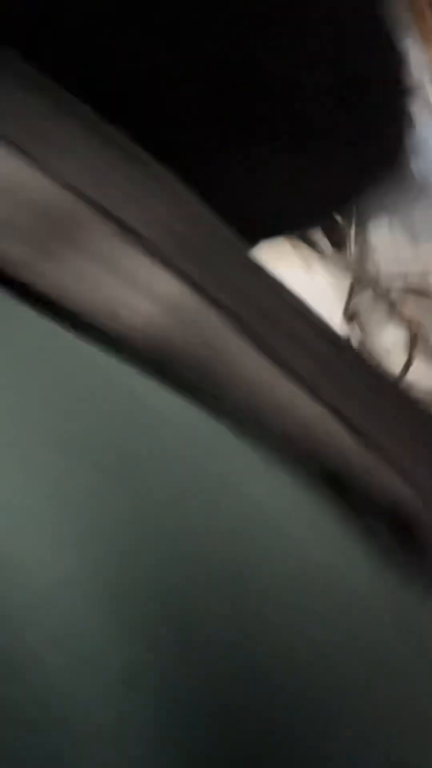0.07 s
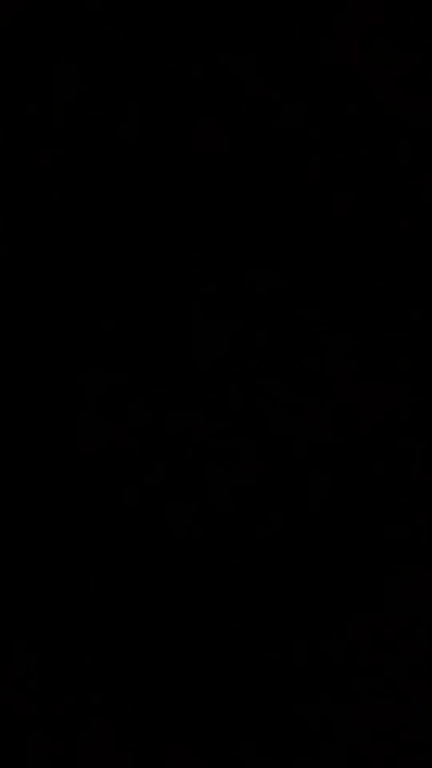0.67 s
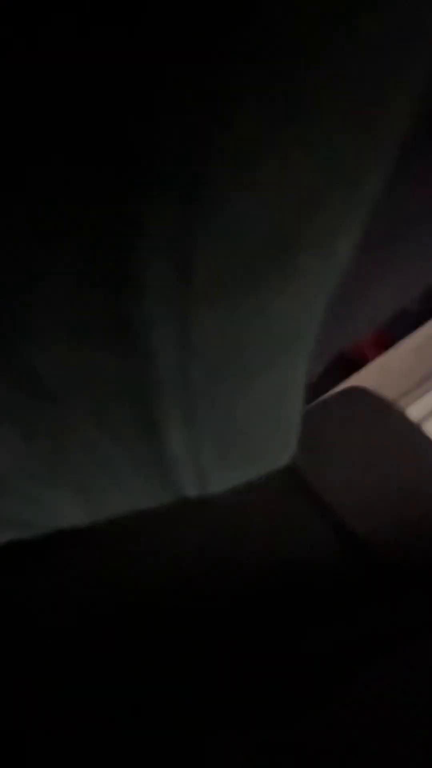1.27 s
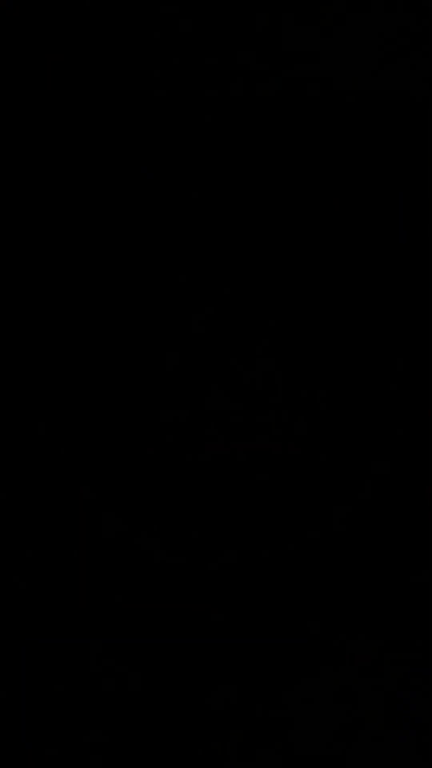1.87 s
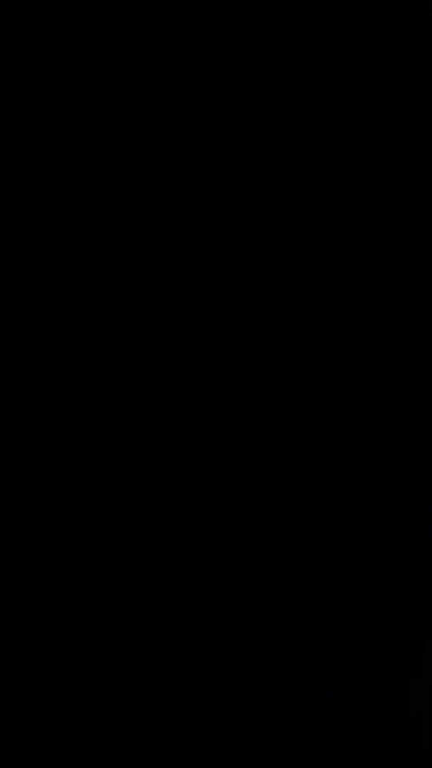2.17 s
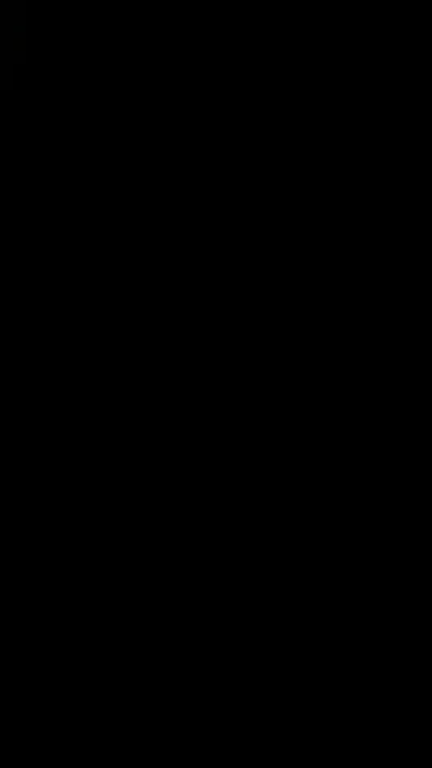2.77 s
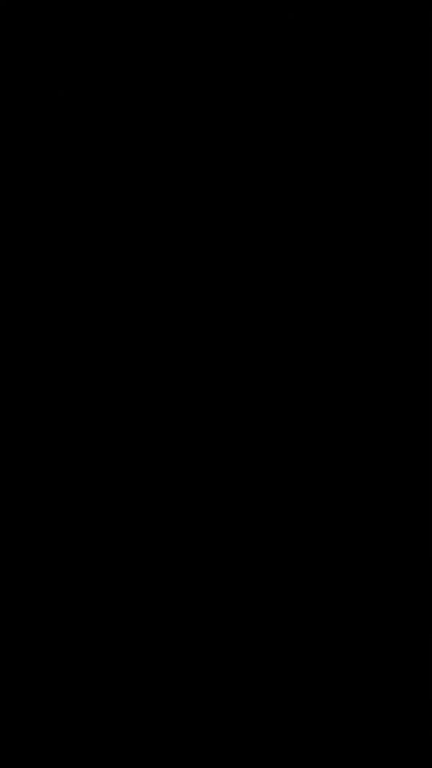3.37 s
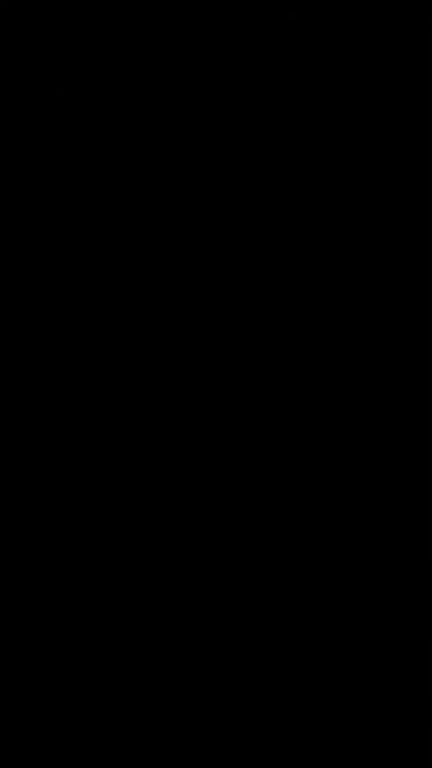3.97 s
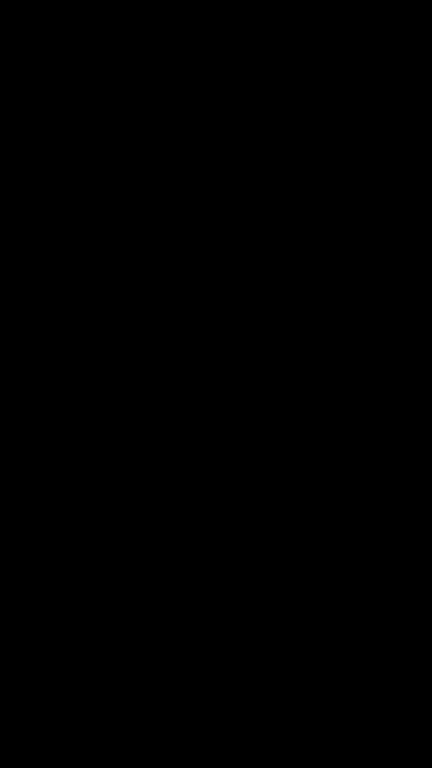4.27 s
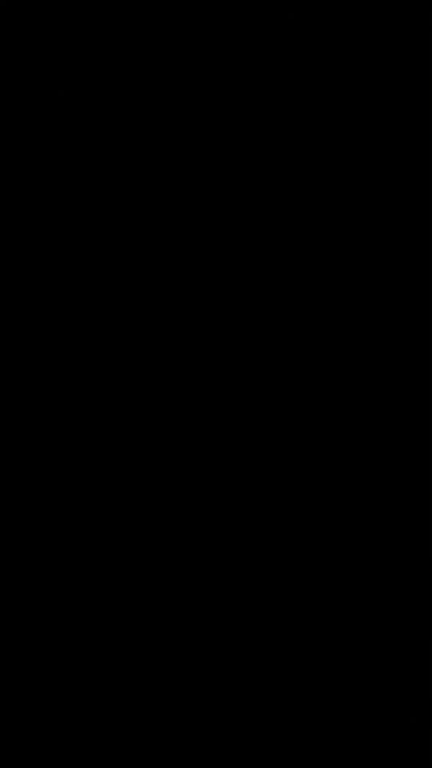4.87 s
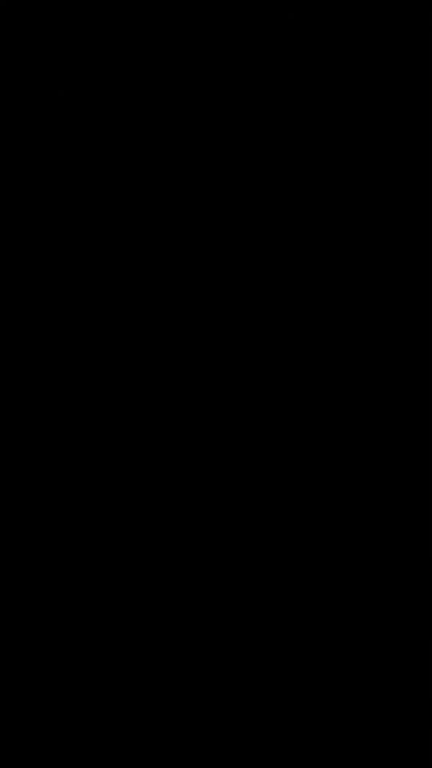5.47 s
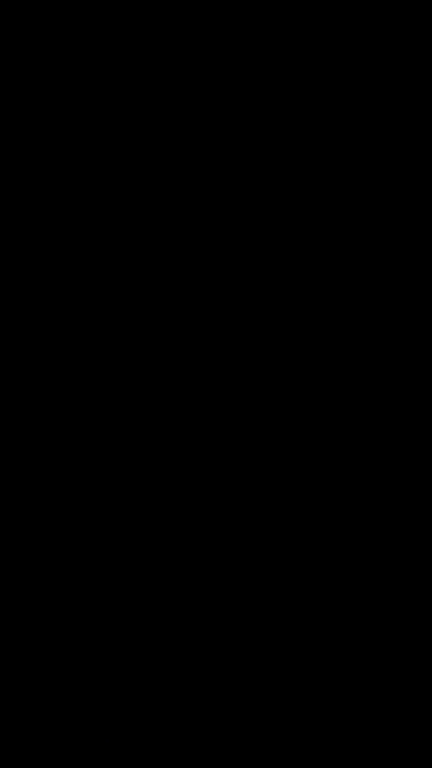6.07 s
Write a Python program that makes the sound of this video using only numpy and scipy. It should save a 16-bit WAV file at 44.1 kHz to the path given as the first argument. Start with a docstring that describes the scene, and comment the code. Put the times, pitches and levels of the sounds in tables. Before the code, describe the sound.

Cloth rubs, rustles and scrapes right against a phone microphone, with dull bumps and small clicks in a quiet room.

```python
"""A phone is moved about in folds of clothing in a quiet room, its two microphone ports brushing the cloth.
Loose fabric swishes past first. From 0.6 s, strokes hiss, rasp and rumble over the case, seams catch
with small clicks and soft bumps thud with a falling pitch. Around 4 s the cloth presses on the ports and
scrubs across them, taut threads squeak, and a wobbling notch climbs through the mids of the rustle.
For the last two seconds the tight cloth drags with a hollow groan."""
import sys
import numpy as np
from scipy import signal
from scipy.fft import rfft, irfft, next_fast_len
from scipy.io import wavfile
from scipy.ndimage import uniform_filter1d

SR = 44100
rng = np.random.default_rng(int(sys.argv[2]) if len(sys.argv) > 2 else 0)


def generate_wav(signal):
    """Clip the signal to [-1, 1] and save it as 16-bit WAV at the path in sys.argv[1]."""
    frames = np.transpose(np.atleast_2d(signal))
    scaled = np.clip(frames, -1, 1) * 32767
    pcm = np.round(scaled).astype(np.int16)
    wavfile.write(sys.argv[1], SR, pcm)


N = 274743
T = np.arange(N) / SR
LEFT_RIGHT = np.array([[1], [-1]])
# resonances of the phone's case: (frequency [Hz], width [Hz], level [dB])
CASE_MODES = [(522, 280, 15), (850, 67, -22), (1032, 150, 6.5), (1276, 33, 1), (1458, 110, -1),
              (1630, 80, -8), (1746, 170, 0.5), (2160, 130, -17), (2330, 21, -3), (4240, 630, -12),
              (6950, 1600, -2)]


def undb(db):
    """Decibels to gain."""
    return 10 ** (np.asarray(db) / 20)


def unit(x):
    """Scale to rms 1."""
    return x / np.sqrt(np.mean(x ** 2))


def add(track, s, sound):
    """Mix a short two-channel sound in at time s."""
    start = int(s * SR)
    track[:, start:start + sound.shape[1]] += sound[:, :N - start]


def curves(table):
    """One automation curve per column, in straight lines between the times in the first."""
    s, *columns = np.transpose(table)
    return [np.interp(T, s, column) for column in columns]


def swells(table, edge_db=14, rise_power=1.62, fall_power=1.61):
    """Slides gather speed, crest and slow down: one envelope per level column, overlaps adding in power."""
    t, power = T[::64], 0
    for start, rise_s, fall_s, *levels_db in table:
        past = t - start - rise_s
        # an exponent of 1 makes a pointed crest, 2 a round one
        away = np.where(past < 0, np.abs(past / rise_s) ** rise_power, np.abs(past / fall_s) ** fall_power)
        shape = undb(-edge_db * np.minimum(away, 10))
        power = power + np.outer(undb(levels_db) ** 2, shape ** 2)
    return np.array([np.interp(T, t, gain) for gain in np.sqrt(power)])


def colour(x, points):
    """EQ through (frequency [Hz], gain [dB]) points."""
    size = next_fast_len(N, real=True)
    bins_hz = np.maximum(np.arange(size // 2 + 1) * SR / size, 1)
    hz, db = np.transpose(points)
    gain = undb(np.interp(np.log(bins_hz), np.log(hz), db))
    return irfft(rfft(x, size) * gain, size)[..., :N]


def resonate(x, hz, width):
    """A two-pole resonance with gain 1 at its centre."""
    return signal.lfilter(*signal.iirpeak(min(hz, SR / 3), hz / min(width, SR / 3), fs=SR), x)


def ring(x, modes):
    """A set of resonances struck together."""
    return sum(undb(db) * resonate(x, hz, width) for hz, width, db in modes)


def walk(rate):
    """Smooth random modulation of rms 1, turning about rate times a second."""
    hold = max(int(SR / rate), 2)
    steps = np.repeat(rng.standard_normal(N // hold + 1), hold)
    return unit(uniform_filter1d(steps, hold)[:N])


def friction(rate, spread_db):
    """Tiny slips of unequal size, about rate a second."""
    slips = (rng.random(N) < rate / SR) * rng.choice([-1, 1], N)
    return unit(slips * undb(spread_db * np.clip(rng.standard_normal(N), -2, 2)))


def shifting(x, depth_db, size=7):
    """Changing folds bring out now one part of the spectrum, now another."""
    frames = signal.stft(x, SR, nperseg=512)[2]
    patches = rng.standard_normal(frames.shape)
    for axis in (0, 1):
        patches = uniform_filter1d(patches, size, axis=axis)
    return unit(signal.istft(frames * undb(depth_db * unit(patches)), SR)[1][:N])


def room(mid_db=-61, side_db=-56):
    """Room tone: faint steady air, diffuse and wide."""
    # tone of the air in the centre and at the sides: (frequency [Hz], gain [dB])
    mid_eq = [(20, 2), (60, -26), (220, 12), (400, -9), (1000, -22), (1800, -5.5), (5000, -9), (10000, -31),
              (12000, -53)]
    side_eq = [(50, -13), (230, -28), (600, -8), (1100, -8), (2000, -13.5), (5000, -15), (10000, -27),
               (12000, -17.5)]
    mid = unit(colour(rng.standard_normal(N), mid_eq))
    side = unit(colour(rng.standard_normal(N), side_eq))
    return undb(mid_db) * mid + LEFT_RIGHT * side * undb(side_db)


def swish(unsteady_db=0.5):
    """Loose cloth sweeps past before it touches the case: a light, airy hiss."""
    # passes of the cloth: (start [s], rise [s], fall [s], level [dB])
    sweeps = [(0, 0.12, 0.17, -53.5), (.26, 0.12, 0.11, -49.5), (.39, 0.1, 0.35, -49.5)]
    # their airy tone: (frequency [Hz], gain [dB])
    airy_eq = [(400, -7), (1100, -6.5), (2200, 3), (3400, -4), (4700, -5.5), (6300, -2.5), (7500, -28),
               (8500, -6), (9600, -3.5), (11000, -18), (12000, -45)]
    gain, = swells(sweeps)
    hiss = shifting(colour(friction(12000, 1.3), airy_eq), depth_db=1.3)
    return hiss * gain * undb(unsteady_db * walk(37))


def scrub(unsteady_db=1.5):
    """Cloth sliding on the ports pushes them in opposite senses: a wide, grainy rustle."""
    # slides right across the ports: (start [s], rise [s], fall [s], level [dB])
    slides = [(0, 0.35, 0.35, -39.5), (3.98, 0.067, 0.16, -29.5), (4.01, 0.011, .015, -24),
              (4.27, 0.12, 0.053, -25), (4.46, 0.12, .34, -28.5), (4.9, 0.24, .15, -31),
              (5.28, .05, 0.14, -35), (5.44, 0.083, 0.49, -34), (5.72, 0.08, 0.42, -45)]
    # their tone: (frequency [Hz], gain [dB])
    rustle_eq = [(100, 3.5), (400, -5), (620, 0), (1100, -0.5), (1500, -4.5), (2000, -6), (3000, -8),
                 (4500, -16), (5200, -17.5), (6200, -16), (7300, -22), (8300, -17), (11000, -37),
                 (12500, -30)]
    gain, = swells(slides)
    rustle = shifting(colour(friction(4000, 3.9), rustle_eq), depth_db=5)
    return LEFT_RIGHT * rustle * undb(unsteady_db * walk(60)) * gain


def rubbing(gains, cover, ring_db=-2, snag_db=-6, hiss_grip_db=0.75, rasp_grip_db=0.45, rumble_grip_db=3.5):
    """Fibres hiss, the weave rasps and rings the case, and the case rumbles, all in one uneven grip."""
    # tone of the fibres, the weave, the weave under cover and the case: (frequency [Hz], gain [dB])
    fibre_eq = [(1500, -6), (2600, -1.5), (4200, 0.5), (5050, -3.5), (5600, 1.5), (6500, 2.5), (7300, -3),
                (8300, 0), (9500, -6), (11000, -11.5), (12000, -35.5), (15000, -58)]
    weave_eq = [(150, -22), (300, 3.5), (480, -4.5), (720, -7), (1050, 0), (1300, 2.5), (1700, 3),
                (2200, 3.5), (2800, -6), (4500, -48), (12000, -60)]
    covered_eq = [(400, 1), (800, -25), (1150, -5), (1500, -0.5), (2000, 7), (2800, -20)]
    rumble_eq = [(20, -41), (40, -8.5), (60, 3.5), (110, -2), (180, -5), (300, -11.5), (440, -32.5),
                 (580, -24), (800, -32.5), (5000, -92)]
    hiss_gain, rasp_gain, rumble_gain = gains
    grip = walk(70)
    hiss = shifting(colour(friction(11000, 1.3), fibre_eq), depth_db=2.0)
    # now and then a thicker thread snags
    threads = colour(friction(3000, 3.3) + undb(snag_db) * friction(130, 0.83), weave_eq)
    rasp = shifting(unit(threads) + undb(ring_db) * unit(ring(threads, CASE_MODES)), depth_db=3.0)
    rasp = (1 - cover) * rasp + cover * colour(rasp, covered_eq)
    rumble = unit(colour(friction(900, 2.5), rumble_eq))
    return (hiss * hiss_gain * undb(hiss_grip_db * grip)
            + rasp * rasp_gain * undb(rasp_grip_db * grip)
            + rumble * rumble_gain * undb(rumble_grip_db * grip))


def cloth(creep_db=(-66, -63.5, -62.5), side_limit_db=(-27, -49.5, -18)):
    """Both ports hear cloth rub the case; each also hears threads of its own, less so when covered."""
    # strokes over the case: (start [s], rise [s], fall [s], hiss [dB], rasp [dB], rumble [dB])
    strokes = [(0.0, 0.21, 0.29, -58.5, -69, -58), (.4, 0.1, 0.13, -65, -60, -48),
               (.628, 0.044, 0.033, -36, -36.5, -15), (.68, .07, 0.12, -41, -43, -20.5),
               (.858, 0.037, 0.07, -43, -49, -23.5), (.925, 0.033, 0.026, -45, -54, -46),
               (1.12, 0.039, 0.094, -47, -51.5, -47.5), (1.31, 0.041, .05, -49.5, -54, -62),
               (1.36, 0.089, 0.09, -39, -47.5, -41.5), (1.56, 0.059, 0.015, -44.5, -47, -52),
               (1.61, 0.09, 0.054, -40.5, -51.5, -40.5), (1.785, 0.019, 0.02, -48, -60, -57),
               (1.8, 0.054, 0.13, -36.5, -41.5, -36), (1.91, 0.099, 0.055, -36.5, -41.5, -35),
               (2.002, 0.067, 0.28, -45.5, -48, -46.5), (2.221, 0.26, 0.078, -36.5, -40, -39),
               (2.43, 0.039, 0.071, -32, -25, -19.5), (2.52, 0.015, 0.021, -43, -38, -38),
               (2.59, 0.028, .03, -48, -39, -40), (2.612, 0.064, .14, -33.5, -32, -32.5),
               (2.711, 0.048, 0.036, -38, -46, -25), (2.746, 0.2, 0.17, -45, -52, -65),
               (3.092, 0.11, 0.18, -34.5, -44, -50), (3.22, 0.054, 0.068, -34.5, -34, -34.5),
               (3.4, 0.037, 0.043, -46, -47, -51), (3.43, 0.072, 0.13, -36, -40.5, -44),
               (3.545, 0.049, 0.014, -39.5, -52, -50), (3.668, 0.059, 0.035, -33, -39, -43),
               (3.7, 0.056, 0.092, -31, -31, -34.5), (3.91, 0.057, 0.086, -47, -42.5, -46.5),
               (3.975, 0.029, 0.019, -51, -33, -40), (3.99, 0.084, 0.094, -37.5, -45, -45),
               (4.1, 0.1, 0.098, -50, -49.5, -52), (4.27, 0.12, 0.05, -34.5, -35.5, -38.5),
               (4.432, .11, 0.4, -39.5, -43.5, -33.5), (4.939, 0.26, 0.077, -42, -37.5, -31),
               (5.24, 0.09, 0.055, -52.5, -46, -44), (5.332, 0.023, 0.016, -31, -36, -34),
               (5.374, 0.01, 0.022, -47, -32, -40), (5.39, 0.12, 0.23, -42, -48, -37),
               (5.462, 0.045, 0.014, -41.5, -35.5, -37), (5.73, 0.17, .08, -41, -44, -31.5),
               (5.921, 0.05, 0.062, -34.5, -33.5, -18), (6.06, 0.029, 0.063, -45, -41.5, -29),
               (6.136, 0.067, 0.081, -47.5, -44, -34)]
    # cloth closing on the ports: (time [s], cover [0-1])
    covering = [(3.9, 0), (4.1, 0.5), (4.35, 0.7), (5.2, 0), (6.23, 0)]
    # tone of what differs between the ports: (frequency [Hz], gain [dB])
    side_eq = [(60, -9), (200, -11), (380, 3), (650, 3.5), (1100, -6.5), (1900, -31), (3000, -3),
               (4000, -15.5), (5100, 3.5), (5900, -29), (7200, -7.5), (8200, -8), (11000, 4.5)]
    cover = np.clip(curves(covering)[0], 0, 1)
    # creeping cloth keeps a bed of hiss, rasp and rumble between the strokes
    gains = np.hypot(swells(strokes), undb(creep_db)[:, None])
    # the loudest rubs sound centred: each layer's side level has a ceiling
    side_gains = gains / np.hypot(1, gains / undb(side_limit_db)[:, None])
    mid = rubbing(gains, cover)
    side = colour(rubbing(side_gains, cover), side_eq) * (1 - cover)
    return mid + LEFT_RIGHT * side


def catches(side_db=-23, snap=5, direct=0.21, rounding=1.08, reach=1.72, quick_reach=2.1):
    """A seam lets go: a short scratch with a snap at its height rings the case."""
    # seams slipping on the case: (time [s], level [dB], centre [Hz], fade [s])
    seams = [(0.624, -21, 700, 0.0019), (.638, -21.5, 686, 0.011), (.75, -21, 850, 0.0057),
             (0.823, -14.5, 1240, 0.00075), (1.576, -29, 1880, .002), (1.579, -32, 5500, 0.00035),
             (1.609, -14, 5200, 0.00082), (1.613, -12, 2340, 0.0011), (1.614, -21.5, 4500, 0.0025),
             (1.984, -23, 1010, 0.0049), (2.209, -26.5, 997, .0015), (2.219, -29.5, 705, 0.0037),
             (2.444, -12, 860, 0.0027), (2.458, -7, 1010, .0011), (2.4638, -2, 3000, 0.0003),
             (2.476, -9.5, 930, 0.0072), (2.500, -6, 1180, 0.0045), (2.5132, 2.5, 1480, .001),
             (2.526, -15.5, 850, 0.0019), (2.777, -10.5, 1230, 0.001), (2.927, -18.5, 960, 0.0013),
             (3.179, -24.5, 1500, 0.0011), (3.268, -19.5, 3230, 0.0043), (3.288, -14.5, 1070, 0.00089),
             (3.3, -28, 1041, 0.0017), (3.671, -24.5, 2040, 0.0015), (3.753, -14.5, 1130, 0.0019),
             (3.778, -25, 905, 0.0028), (3.947, -25.5, 1090, .0012), (3.963, -24.5, 1000, 0.0013),
             (3.993, -21, 1900, 0.00085), (4.007, -29, 1700, 0.002), (4.384, -21.5, 3230, 0.0063),
             (4.452, -32, 400, 0.0024), (4.912, -24, 480, 0.0033), (4.987, -21.5, 1710, 0.00193),
             (5.087, -31, 1900, .001), (5.126, -25, 1500, 0.00089), (5.137, -23.5, 6000, .0005),
             (5.143, -20, 2400, .0006), (5.157, -16.5, 1820, 0.00064), (5.171, -10.5, 690, 0.0014),
             (5.195, -13.5, 2600, 0.00033), (5.195, -13.5, 6000, .0006), (5.222, -20, 4500, 0.0007),
             (5.227, -22, 4950, .0007), (5.219, -21.5, 1690, 0.0041), (5.243, -20, 720, 0.002),
             (5.262, -27, 750, 0.0012), (5.284, -19, 1100, 0.00055), (5.3386, -2.5, 2620, 0.00047),
             (5.341, -13, 1510, 0.00099), (5.349, -19, 4470, 0.0042), (5.43, -29, 553, 0.0023),
             (5.955, -8.5, 450, 0.0028), (5.98, -9, 395, 0.0048), (6.07, -27, 620, 0.0029)]
    out, t = np.zeros((2, N)), T[:SR // 8]
    for s, db, hz, fade_s in seams:
        width_hz = hz * 0.82 * (0.001 / fade_s) ** 0.47  # a quicker catch is broader
        envelope = (t / fade_s * np.exp(1 - t / fade_s)) ** rounding
        scratch = rng.standard_normal((2, len(t))) * envelope
        scratch[0, int(fade_s * SR)] += snap
        click = resonate(ring(scratch, CASE_MODES) + direct * scratch, hz, width_hz)
        # only the quickest snaps reach far above and below their centre
        span = reach + quick_reach * (width_hz / hz) ** 3
        band = signal.butter(2, [hz / span, min(hz * span, SR / 3)], "bandpass", fs=SR, output="sos")
        mid, side = signal.sosfilt(band, click)
        add(out, s, (mid + LEFT_RIGHT * side * undb(side_db)) * undb(db) / np.abs(mid).max())
    # the cloth swallows the highest treble
    return colour(out, [(10000, -3.5), (12500, -24)])


def bumps(rest_hz=52, glide_s=0.015, rough=0.18, waver=0.11, padding=1.19, side_phase_rad=1.13):
    """Padded blows swell and let go: the pitch sinks unevenly as the contact relaxes."""
    # soft blows on the case: (time [s], level [dB], starting pitch [Hz], swell [s])
    blows = [(.627, -5.5, 225, .01), (.641, -7.5, 298, 0.0085), (.652, -5.5, 271, 0.0077),
             (.664, -2, 118, 0.016), (.708, -17, 150, .008), (0.75, -11, 148, 0.011),
             (.758, -16, 332, 0.0083), (.777, -12.5, 340, 0.006), (.822, -16, 170, 0.0081),
             (.873, -14, 213, .009), (.889, -16, 300, 0.0085), (.905, -21, 260, 0.0091),
             (.937, -27, 170, .009), (.956, -28.5, 340, 0.0054), (0.967, -25.5, 75, 0.012),
             (1.157, -34.5, 300, 0.012), (1.613, -15.5, 347, .008), (1.626, -11.5, 139, 0.013),
             (2.222, -9.5, 286, 0.0074), (2.235, -17, 70, 0.014), (2.459, -4, 290, 0.0077),
             (2.477, -10.5, 90, 0.018), (2.503, -12.5, 240, 0.0091), (2.536, -21, 332, 0.0061),
             (2.777, -23, 200, 0.011), (2.928, -35.5, 328, 0.0069), (2.939, -27.5, 115, 0.012),
             (3.183, -32, 232, .012), (3.279, -25, 346, .009), (3.289, -21, 136, 0.0157),
             (3.774, -22, 406, 0.0068), (4.018, -29.5, 70, 0.027), (4.245, -22.5, 213, 0.0093),
             (4.398, -22.5, 130, .012), (4.912, -22, 462, 0.0059), (4.922, -21.5, 188.5, .012),
             (5.236, -30, 100, 0.026), (5.337, -21, 530, 0.0065), (5.378, -25.5, 605, 0.0086),
             (5.393, -21, 432, 0.0075), (5.426, -28.5, 420, 0.012), (5.681, -29, 117, 0.013),
             (5.787, -17.5, 89, 0.013), (5.893, -17, 110, .009), (5.935, -14, 170, .01),
             (5.953, -13.5, 420, 0.0063), (5.98, -15, 490, 0.0053), (5.991, -2, 218, 0.0077),
             (6.005, -15.5, 140, 0.014), (6.043, -18, 80, .012)]
    out, t = np.zeros((2, N)), T[:SR // 4]
    unsteady = np.exp(waver * walk(150))
    for s, db, start_hz, swell_s in blows:
        hz = rest_hz + (start_hz - rest_hz) * np.exp(-t / glide_s)
        phase = 2 * np.pi * np.cumsum(hz * np.interp(s + t, T, unsteady)) / SR
        push = undb(db) * (t / swell_s * np.exp((1 - (t / swell_s) ** 2) / 2)) ** padding
        width = (hz - rest_hz) / 200  # only the quick start of a blow differs between the ports
        add(out, s, push * np.array([np.sin(phase), width * np.sin(phase + side_phase_rad)]))
    mid, side = out * (1 + rough * walk(260))
    return mid + LEFT_RIGHT * side


def squeaks(width_hz=520, flutter_db=5.5):
    """Taut threads chatter on the case for a moment: a narrow, grainy chirp."""
    # chirps of the threads: (start [s], rise [s], fall [s], level [dB], pitch [Hz])
    chirps = [(3.99, 0.021, 0.013, -40, 1860), (5.373, 0.0086, .016, -29, 1850),
              (5.476, 0.035, 0.008, -30.5, 2000)]
    slips = friction(2500, 2.5) * undb(flutter_db * walk(200))
    out = np.zeros(N)
    for *swell, hz in chirps:
        chatter = resonate(resonate(slips, hz, width_hz), hz, width_hz)
        out += unit(chatter) * swells([swell])[0]
    return out


def moving_notch(x, wobble=0.023, half_width_octaves=0.26, upper_share=0.22):
    """A wobbling notch climbs through the mids and hollows out the rustle."""
    # path of the notch, a boost while its depth is negative: (time [s], centre [Hz], depth [dB])
    notch_path = [(4.0, 830, -12), (4.04, 830, 29), (4.12, 855, 3), (4.18, 891, 19), (4.25, 970, 40),
                  (4.33, 1040, 35), (4.39, 890, 13), (4.52, 980, 0), (4.6, 1150, 20), (4.65, 1140, 4),
                  (4.72, 1250, 28), (4.84, 1240, 25), (4.92, 1230, 0), (5.03, 1200, 3), (5.12, 1240, 9),
                  (5.6, 1240, 3)]
    hz, s, frames = signal.stft(x, SR, nperseg=1024)
    centre_hz, depth_db = curves(notch_path)
    centre_hz = np.interp(s, T, centre_hz * np.exp(wobble * walk(27)))
    octaves = np.log2(np.maximum(hz, 1)[:, None] / centre_hz)
    notch = np.exp(-(octaves / half_width_octaves) ** 2)
    octave_notch = np.exp(-(2 * (octaves - 1) / half_width_octaves) ** 2)
    cut_db = np.interp(s, T, depth_db) * (notch + upper_share * octave_notch)
    return signal.istft(frames * undb(-cut_db), SR)[1][:, :N]


def drag(unsteady_db=3.0, wander=0.04, jitter=0.1, flutter_db=2.5, overtone_db=-24):
    """Tight cloth shakes the air trapped under it, and sticks and slips in a rough, wandering groan."""
    # pulls of the cloth: (start [s], rise [s], fall [s], judder [dB], groan [dB], pitch [Hz])
    pulls = [(4.34, 0.32, 0.42, -37.5, -44, 575), (4.95, 0.029, 0.13, -35.5, -39, 603),
             (5.044, 0.028, 0.064, -30, -20.5, 551.3), (5.085, 0.056, 0.08, -25.5, -25.5, 582),
             (5.33, 0.1596, 0.2, -35.5, -45, 559.6), (5.81, 0.18, 0.051, -26, -34.5, 528),
             (5.98, 0.098, 0.57, -35.5, -42.5, 557)]
    # resonances of the trapped air: (frequency [Hz], width [Hz], level [dB])
    pocket_modes = [(308, 220, 5), (383, 530, -3), (500, 91, -0.5), (627, 42, -1), (745, 150, -11)]
    judder_gain, groan_gain = swells([row[:5] for row in pulls])
    pocket = ring(friction(1200, 3.4), pocket_modes)
    judder = unit(resonate(pocket, hz=350, width=420)) * undb(unsteady_db * walk(80))
    hz, = curves([(start + rise_s, pitch_hz) for start, rise_s, *_, pitch_hz in pulls])
    rough_hz = hz * np.exp(wander * walk(50) + jitter * walk(700))
    phase = 2 * np.pi * np.cumsum(rough_hz) / SR
    tone = np.sin(phase) + undb(overtone_db) * np.sin(3 * phase)
    groan = unit(tone * undb(flutter_db * walk(350)))
    return judder * judder_gain + groan * groan_gain


def centre_bass(x):
    """The bass narrows to the centre, below a moving crossover that is highest near the end."""
    # edge below which left and right sound as one: (time [s], crossover [Hz])
    crossover = [(.5, 29.4), (.65, 183), (2.6, 220), (3.1, 100), (4.28, 40), (4.35, 287), (4.5, 413),
                 (4.73, 504), (4.82, 680), (4.98, 660), (5.08, 463), (5.3, 546), (5.5, 820), (5.95, 840)]
    mid, side = (x[0] + x[1]) / 2, (x[0] - x[1]) / 2
    hz, s, frames = signal.stft(side, SR, nperseg=1024)
    slope = (hz[:, None] / np.interp(s, T, curves(crossover)[0])) ** 12
    high_side = signal.istft(frames * slope / np.hypot(1, slope), SR)[1][:N]
    return mid + LEFT_RIGHT * high_side


def scene():
    """The notched rustle and room tone, with the scrubs, bumps, clicks and squeaks on top."""
    rustle = moving_notch(cloth() + swish() + drag() + room())
    return rustle + scrub() + bumps() + catches() + squeaks()


def record(dry):
    """The phone centres the bass, rounds the loudest peaks and cuts the top."""
    centred = centre_bass(dry)
    rounded = centred / (1 + centred ** 8) ** (1 / 8)
    high_cut = signal.ellip(8, 0.2, 70, 15400, fs=SR, output="sos")
    return signal.sosfilt(high_cut, rounded)


dry = scene()
out = record(dry)
generate_wav(out)
```